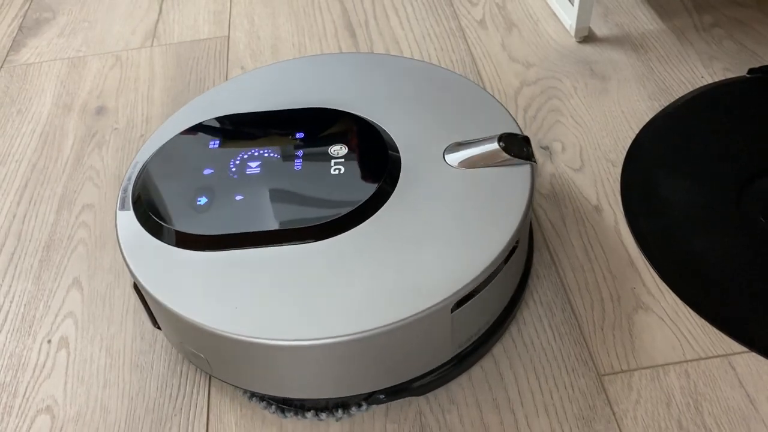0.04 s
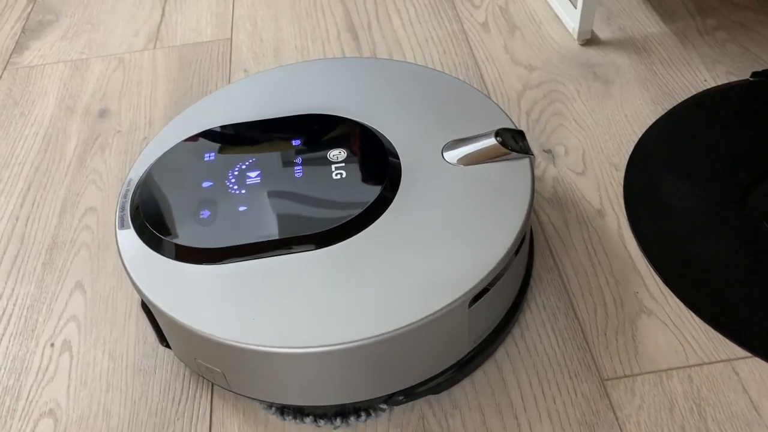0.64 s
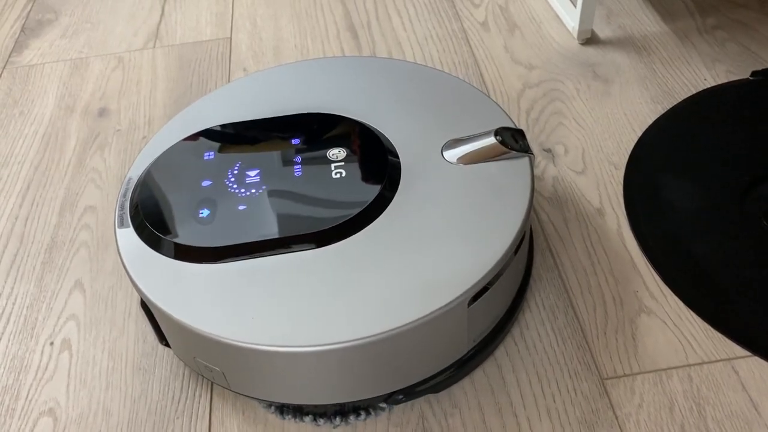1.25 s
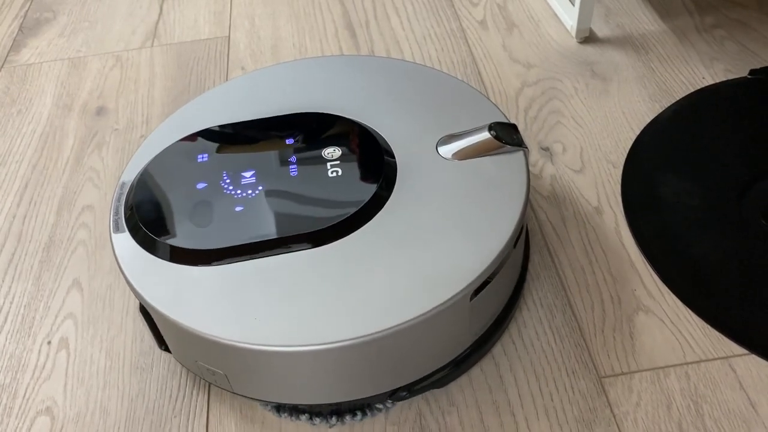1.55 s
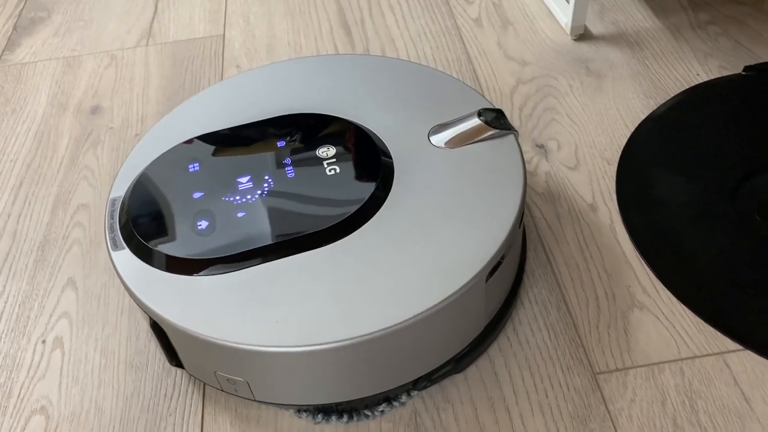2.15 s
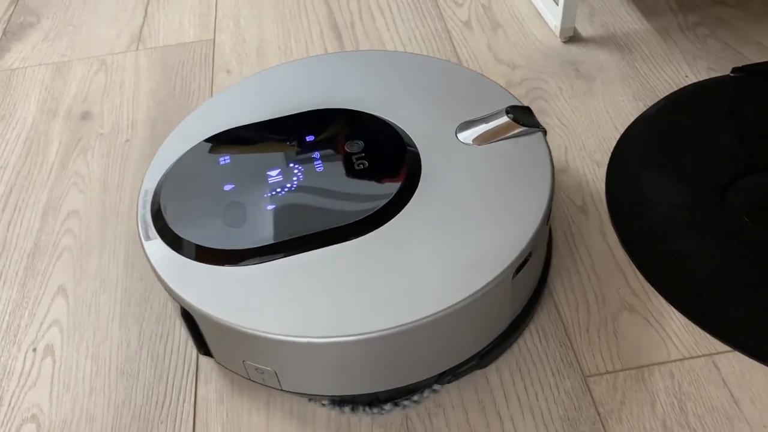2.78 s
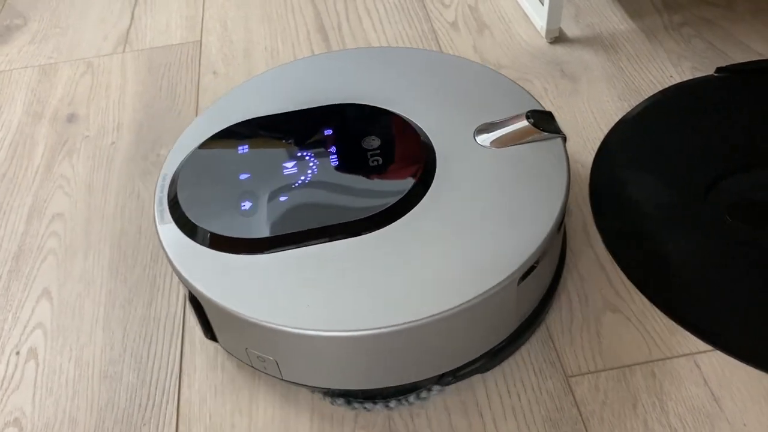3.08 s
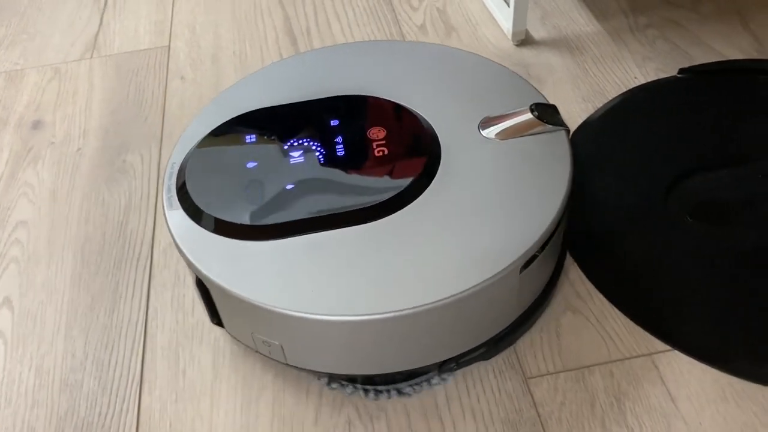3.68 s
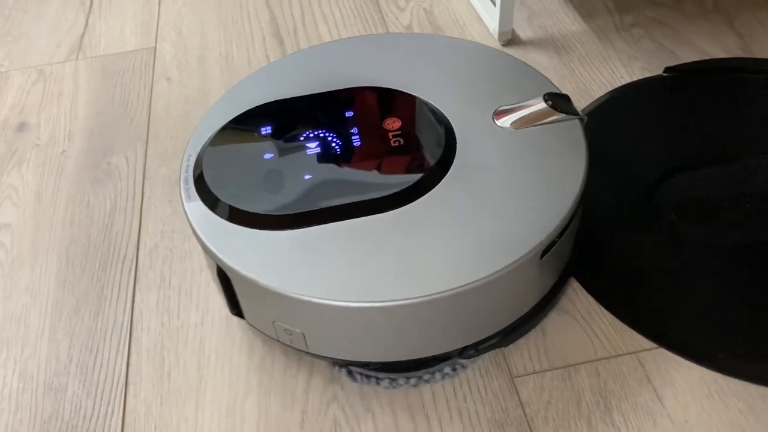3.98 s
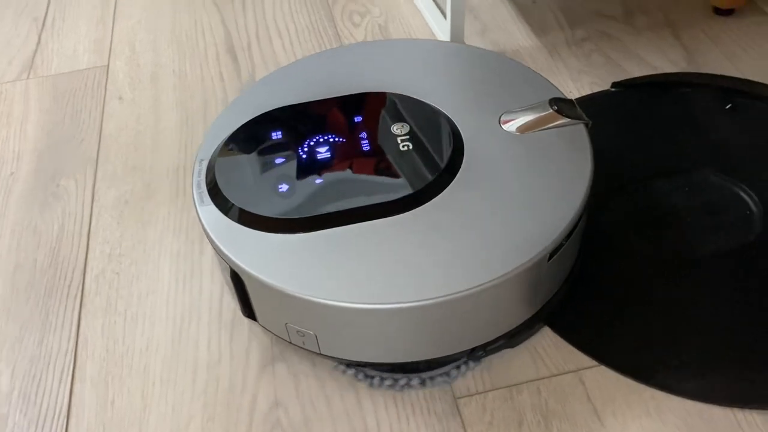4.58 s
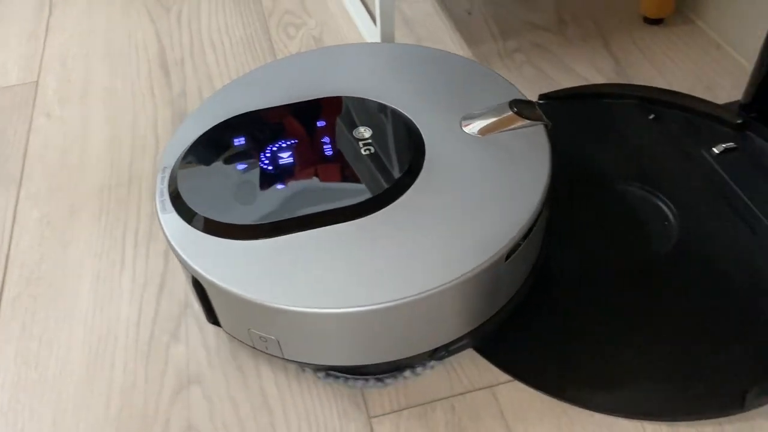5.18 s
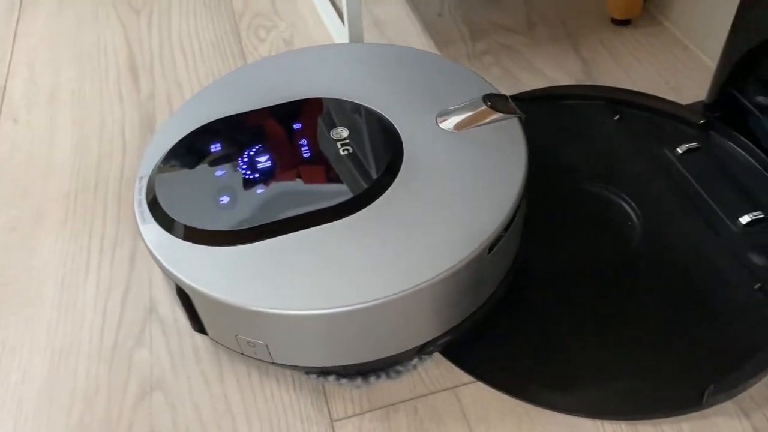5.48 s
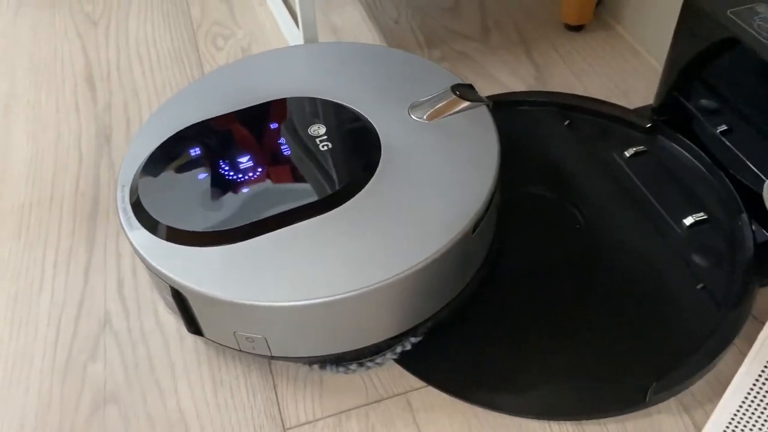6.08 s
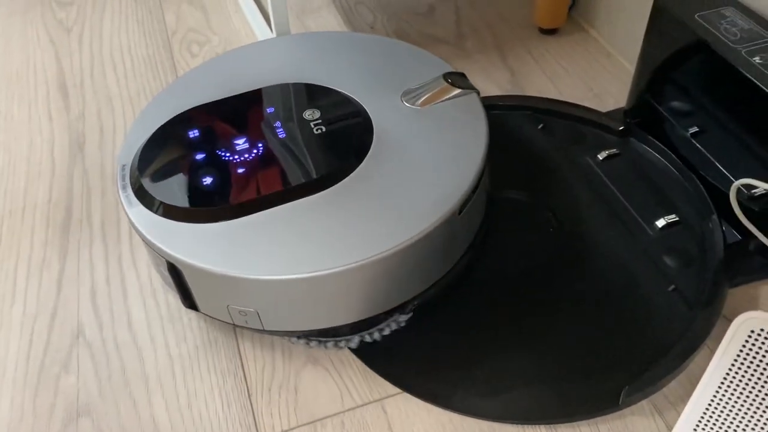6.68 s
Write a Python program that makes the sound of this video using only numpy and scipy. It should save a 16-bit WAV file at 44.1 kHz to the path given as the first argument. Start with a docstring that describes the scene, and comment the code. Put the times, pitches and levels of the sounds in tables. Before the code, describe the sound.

Quiet motor hum and cloth rubbing from a robot floor cleaner, with light knocks, a hollow bump and a closing low judder.

```python
"""A robot mop creeps over a laminate floor and up onto the plastic plate of its dock.
Taken in a quiet room, in stereo, on a phone an arm's length away. The drive rumbles, the gears whirr
and the motor electronics whine faintly. Two spinning cloth pads hiss on the floor and, sticking and
slipping, chatter into the shell, then into the hollow plate. The shell knocks and grit ticks on the
way; at last the pads rasp and judder against the ramp."""
import sys
import numpy as np
from scipy import signal
from scipy.fft import rfft, irfft, next_fast_len
from scipy.io import wavfile
from scipy.ndimage import uniform_filter1d, map_coordinates

SR = 44100
rng = np.random.default_rng(int(sys.argv[2]) if len(sys.argv) > 2 else 0)


def file_out(sig):
    """Save sig as 16-bit WAV at sys.argv[1]."""
    # one column per channel
    cols = np.atleast_2d(sig).T
    # limit, then scale
    lim = np.clip(cols, -1, 1)
    pcm = np.round(lim * 32767).astype(np.int16)
    wavfile.write(sys.argv[1], SR, pcm)


N = 306054
TIME = np.arange(N) / SR

# Levels in the tables are relative: each source adds its own gain and place.
# room tone at the microphone: f/Hz, level/dB
ROOM_SPECTRUM = [(20, 2.5), (40, -8.5), (85, 6.5), (140, -8.5), (230, -12), (400, -17.5), (900, -29.5),
                 (1900, -29.5), (3000, -36), (8000, -44.5), (16000, -49.5)]
# rumble of the drive: t/s, level/dB
RUMBLE_CURVE = [(0, -61.5), (0.06, -53.5), (0.22, -51.5), (0.37, -46), (0.47, -53), (0.58, -51),
                (0.74, -59.5), (1.0, -56), (2.04, -55.5), (2.1, -51.5), (2.22, -56), (3.5, -52.5),
                (4.7, -55), (5.5, -52), (5.8, -51), (6.19, -54.5), (6.235, -46), (6.36, -47), (6.43, -52.5),
                (6.58, -54.5), (6.7, -49)]
# brief dips of the rumble: t/s, length/s, depth/dB
RUMBLE_DIPS = [(1.945, 0.027, 6), (2.053, 0.03, 0), (3.12, 0.048, 11), (4.044, 0.044, 17),
               (4.564, 0.039, 2), (5.172, 0.055, 8.5), (5.406, 0.04, 9)]
# resonances of the body on its suspension: f/Hz, width/Hz, level/dB
BODY_PEAKS = [(61.44, 7, 2.5), (78.2, 12, 1.5), (99, 9.7, -11), (117, 8.9, -10), (170, 8.3, -34)]
# resonances of the gearboxes: f/Hz, width/Hz, level/dB
GEARBOX_PEAKS = [(570, 47, -2), (703, 90, -0.5), (1104, 250, -5), (1400, 300, -1), (1950, 99, -4),
                 (2310, 1300, -20.5)]
# whine of the motor electronics: t/s, level/dB
WHINE_CURVE = [(0.0, -93), (0.23, -88.5), (0.96, -86), (2.27, -94), (2.36, -90), (3.66, -92), (3.8, -85),
               (4.22, -83), (4.55, -91), (4.98, -88), (5.17, -85), (6.65, -82), (6.9, -90)]
# short wipes of the pads before they spin steadily: start/s, end/s, rub/dB, hiss/dB
PAD_WIPES = [(-.07, 0.305, -82, -101), (1.35, 1.668, -80.5, -100.5), (1.694, 1.883, -81.5, -100.5)]
# steady spin, louder and brighter as the cloth presses harder: t/s, rub/dB, hiss/dB
PAD_SPIN = [(2.3, -74, -86.5), (2.5, -73, -83), (2.9, -74, -83), (3.22, -73, -83.5), (3.35, -75.5, -87.5),
            (3.58, -76, -88), (3.72, -73, -81.5), (4.15, -73, -81.5), (4.58, -73, -85), (4.83, -71.5, -79),
            (4.92, -74, -83), (5.06, -72.5, -76.5), (5.3, -72.5, -80.5), (5.8, -71, -79.5),
            (6.4, -75, -83.5), (6.75, -75, -82.5)]
# damp cloth rubbing on laminate: f/Hz, level/dB
RUB_SPECTRUM = [(200, -0.5), (500, 0.5), (1000, -2), (2000, -0.5), (3000, -2), (4200, -6.5), (6000, -13),
                (9000, -24), (16000, -40)]
# fine, bright hiss, with dips near 9 and 13 kHz from the phone's audio coding: f/Hz, level/dB
HISS_SPECTRUM = [(1200, -20), (2200, -3), (3300, 4), (5000, 3), (7300, 5), (9000, -1), (11000, 3),
                 (13000, -3), (15500, -2.5)]
# resonances of the gap under the skirt: f/Hz, width/Hz, level/dB
SKIRT_PEAKS = [(700, 37, 2.5), (760, 20, -0.5), (1174, 30, -2), (1396, 59, -2.5), (1916, 37, -1.5),
               (1990, 52, -6), (2504, 120, -11.5), (2726, 130, -9.5), (3360, 160, -13), (4290, 160, -17)]
# the pads catch on the floor: middle/s, length/s, level/dB
CATCHES_ON_FLOOR = [(0.192, 0.29, -68.5), (0.586, 0.17, -75), (1.34, 0.18, -72), (2.193, 0.15, -69),
                    (2.795, 0.33, -66), (3.093, 0.2, -68.5), (4.207, 0.096, -65.5), (4.617, 0.042, -58.5),
                    (4.795, 0.15, -61), (5.091, 0.12, -59.5)]
# low and high resonances of the shell: f/Hz, width/Hz, level/dB
SHELL_DRUM_PEAKS = [(191.5, 42, 2.5), (260.5, 56, 1.5), (343, 39, -6.5), (401, 24, -5)]
SHELL_RATTLE_PEAKS = [(574, 20.3, 6), (696, 41, -1), (763, 64, -1), (849, 104, -1.5), (1160, 43, -4),
                      (1390, 280, -13.5)]
# soft scuffs at the skirt as the pads take hold: middle/s, length/s, level/dB
SKIRT_SCUFFS = [(0.227, 0.39, -76.5), (1.323, 0.15, -78), (1.585, 0.31, -76.5), (2.8, 0.42, -76)]
# grit under the wheels: t/s, peak/dB, centre/Hz
GRIT_TICKS = [(0.127, -72, 6000), (0.578, -67, 3000), (0.621, -68.5, 4000), (1.199, -75, 1700),
              (2.828, -57, 2600), (4.268, -55, 6460)]
# knocks in the shell: t/s, peak/dB, contact cut-off/Hz, low cut/Hz
SHELL_BLOWS = [(.581, -50.5, 1010, 620), (.623, -54, 905, 318), (.668, -59.5, 750, 477),
               (1.2, -62.5, 1700, 700), (1.279, -62, 695, 250), (1.918, -43, 700, 326),
               (2.081, -65, 1000, 590), (2.189, -51, 400, 377)]
# modes a blow rings in the shell: f/Hz, t60/s, level/dB
SHELL_RING = [(172, 0.12, 10.5), (363, 0.073, 2.5), (426, 0.041, -0.5), (581, 0.062, 1), (681, 0.081, 0),
              (1204, 0.045, -4.5), (1420, 0.032, -5), (1930, 0.029, 2), (2737, 0.051, -3),
              (3260, 0.078, -13)]
# the gearboxes labour as the pads first drag: middle/s, length/s, level/dB
GEAR_LOADS = [(1.62, 0.35, -82), (2.56, .18, -72), (2.82, 0.16, -69), (3.08, 0.14, -77)]
# resonances of the labouring gears: f/Hz, width/Hz, level/dB
LOADED_GEAR_PEAKS = [(710, 22, 4), (765, 17, 1), (1197, 29, -11.5)]
# skids of the skirt's rim, one rising, one falling: start/s, end/s, first f/Hz, last f/Hz, level/dB
RIM_SKIDS = [(2.076, 2.151, 650, 1300, -77), (2.127, 2.18, 420, 293, -67)]
# the cloth scrubs harder: middle/s, length/s, level/dB
CLOTH_BITES = [(2.808, 0.2, -75), (3.14, 0.34, -74.5), (3.92, 0.24, -74.5), (4.195, 0.27, -72.5),
               (5.7, 0.27, -80)]
# swish of the scrubbing: f/Hz, level/dB
SCRUB_SPECTRUM = [(1200, -23), (2300, -3), (2900, -1), (3700, -1), (4600, -4), (7000, -10), (14000, -52)]
# knocks on the dock: t/s, peak/dB, contact cut-off/Hz, low cut/Hz
DOCK_BLOWS = [(4.151, -48.5, 1000, 795), (4.155, -42.5, 258, 159), (4.156, -57, 2010, 1700),
              (4.606, -52, 1200, 197), (4.737, -50, 800, 400), (5.1, -50.5, 593, 110),
              (5.613, -32, 1870, 91), (6.507, -49, 650, 400), (6.644, -52, 650, 400)]
# modes a blow rings in the dock plate: f/Hz, t60/s, level/dB
PLATE_RING = [(149, 0.22, 3), (223, 0.034, -0.5), (295, 0.082, -7.5), (424, 0.027, -3.5), (590, 0.033, 1),
              (665, 0.032, 1.5), (838, 0.031, -4.5), (1070, 0.035, -3.5), (1170, 0.053, -9),
              (1450, 0.015, -3), (1930, 0.023, -9), (2254, 0.064, -6), (2680, 0.016, -6.5),
              (4250, 0.023, -6)]
# the pads catch on the plate: middle/s, length/s, level/dB
CATCHES_ON_PLATE = [(5.67, 0.083, -58.5), (6.03, 0.3, -58), (6.27, 0.091, -61.5), (6.64, 0.049, -59),
                    (6.773, 0.23, -56.5), (6.939, 0.09, -52.5)]
# low and high resonances of the hollow plate: f/Hz, width/Hz, level/dB
PLATE_DRUM_PEAKS = [(212, 60, 2.5), (274, 29, 1.5), (350, 50, -9)]
PLATE_RATTLE_PEAKS = [(588, 37, 4), (633, 34, -0.5), (837, 37, 2.5), (1010, 76, -5.5), (1422, 28, -8)]
# the pads rasp over the ramp's ribs: middle/s, length/s, level/dB
RIB_RASPS = [(6.64, 0.16, -73), (6.729, 0.03, -70), (6.806, .02, -65.5), (6.858, 0.09, -65.5)]
# resonances of the ramp's ribbed face: f/Hz, width/Hz, level/dB
RAMP_PEAKS = [(1090, 180, 0.5), (1390, 75, -1), (1960, 58, 0), (2190, 160, -2.5), (2320, 250, -7.5)]
# the pads judder on the ramp: t/s, slip rate/Hz, level/dB
JUDDER_CURVE = [(6.62, 62.2, -83), (6.72, 65.2, -57.5), (6.79, 58.2, -54.5), (6.85, 59.2, -39),
                (6.89, 58.8, -42.5), (6.94, 56.5, -37)]


def undb(db):
    """Decibels to gain."""
    return 10 ** (np.asarray(db) / 20)


def unit(x):
    """Scale to an rms of one."""
    return x / np.sqrt(np.mean(x ** 2))


def curves(table):
    """Each column after the times, at every sample."""
    times, *columns = np.transpose(table)
    return [np.interp(TIME, times, column) for column in columns]


def wander(rate_hz):
    """Smooth random drift with an rms of one."""
    hold = max(int(SR / rate_hz), 1)
    steps = np.repeat(rng.standard_normal(N // hold + 1), hold)
    return unit(uniform_filter1d(uniform_filter1d(steps, hold), hold)[:N])


def swell(middle_s, length_s):
    """A smooth rise and fall, above half height for the given length."""
    return .5 ** np.minimum((2 * (TIME - middle_s) / length_s) ** 2, 60)


def swells(table):
    """The summed gain of a table of swells."""
    return sum(undb(db) * swell(middle, length) for middle, length, db in table)


def through(x, response):
    """Filter by a function of frequency; the result has an rms of one."""
    size = next_fast_len(N, True)
    f = np.maximum(np.arange(size // 2 + 1) * SR / size, 1)
    return unit(irfft(rfft(x, size) * response(f), size)[..., :N])


def colour(x, spectrum):
    """Shape a sound by points of frequency and level."""
    hz, db = np.transpose(spectrum)
    return through(x, lambda f: undb(np.interp(np.log(f), np.log(hz), db)))


def resonate(x, peaks):
    """Pass a sound through parallel, steep-sided resonances."""
    return through(x, lambda f: sum(undb(db) / (1 + .5j * (f * f - hz * hz) / (f * width)) ** 2
                                    for hz, width, db in peaks))


def band(x, low_hz, high_hz):
    """Second-order high-pass and low-pass."""
    for hz, kind in ((low_hz, "high"), (high_hz, "low")):
        x = signal.sosfilt(signal.butter(2, min(hz, SR / 2 - 1000), kind, fs=SR, output="sos"), x)
    return x


def slips(per_s, spread_db):
    """Friction: two unrelated streams of tiny slips, a few much stronger than the rest."""
    slipping = rng.random((2, N)) < per_s / SR
    size = np.minimum(rng.exponential(size=(2, N)), 5)
    sign = rng.choice([-1, 1], (2, N))
    return slipping * sign * undb(spread_db * size)


def add(out, start_s, x):
    """Mix in a short sound."""
    i = int(start_s * SR)
    out[i:i + len(x)] += x[:N - i]


def pan(pair, pan_db):
    """Favour the left microphone over the right by pan_db."""
    return pair * undb(np.array([[pan_db], [-pan_db]]) / 2)


def place(pair, side_db, pan_db):
    """One stream reaches both microphones alike; the other is diffuse and differs between them."""
    mid, side = pair[0], undb(side_db) * pair[1]
    return pan(np.array([mid + side, mid - side]), pan_db)


def room(x, wet_db, t60=0.17):
    """The direct sound and a short tail from the walls, different at each microphone."""
    t = np.arange(SR // 2) / SR
    tail = rng.standard_normal((2, len(t))) * undb(-60 * t / t60) * (t > .003)
    tail *= undb(wet_db) / np.sqrt(np.sum(tail ** 2, axis=1, keepdims=True))
    return x + signal.fftconvolve(x[None], tail, axes=1)[:, :N]


def room_tone():
    """The quiet, dull air of the room, all round the phone."""
    air = colour(rng.standard_normal((2, N)), ROOM_SPECTRUM)
    return place(air * undb(-66.5), side_db=-3.5, pan_db=2.0)


def drive_rumble():
    """Dead centre, gears and wheels shake the body on its suspension; the level dips now and then."""
    db, = curves(RUMBLE_CURVE)
    dip_db = sum(depth * swell(middle, length) for middle, length, depth in RUMBLE_DIPS)
    shake = resonate(rng.standard_normal((2, N)), BODY_PEAKS)
    shake /= np.sqrt(uniform_filter1d(shake ** 2, size=3000))  # keeps the strength fairly even
    return place(shake * undb(db - dip_db + 1.4 * wander(26) + 1.5), side_db=-28.5, pan_db=0.0)


def gear_whirr(rub_gain, shaft_hz=57.6, idle_db=-87.0, load_db=7.5, max_load_db=-81.5):
    """Gear teeth whirr softly, pulsing once a shaft turn, louder against the pads' drag."""
    turn = 2 * np.pi * np.cumsum(shaft_hz * (1 + 0.016 * wander(6.1))) / SR
    teeth = resonate(slips(per_s=5000, spread_db=1.0), GEARBOX_PEAKS)
    load = np.minimum(rub_gain * undb(load_db), undb(max_load_db))
    whirr = teeth * (1 + 0.17 * np.sin(turn)) * np.hypot(undb(idle_db), load)
    return place(whirr, side_db=3, pan_db=0.0)


def motor_whine(whine_hz=15391, neighbour_gap_hz=118):
    """The motor electronics sing one thin, fluttering tone with a weak neighbour below it."""
    db, = curves(WHINE_CURVE)
    phase = 2 * np.pi * np.cumsum(whine_hz + 13 * wander(90)) / SR
    neighbour = undb(-15 + 2.0 * wander(19)) * np.sin(phase - 2 * np.pi * neighbour_gap_hz * TIME)
    flutter_db = 1.5 * wander(45)
    return unit(np.sin(phase) + neighbour) * undb(db + flutter_db + 3.5)


def stroke(start, end, attack_s, release_s=0.064):
    """The pads come up to speed, hold, and run down after the end."""
    rise = np.clip((TIME - start) / attack_s, 0, 1) ** 2
    return rise * np.exp(-np.maximum(TIME - end, 0) / release_s)


def pad_contact(spin_start_s=2.225):
    """Gains of the rub and of the fine hiss: a few wipes, then the steady spin."""
    strokes = [(stroke(start, end, attack_s=0.093), rub_db, hiss_db)
               for start, end, rub_db, hiss_db in PAD_WIPES]
    strokes.append((stroke(spin_start_s, N / SR, attack_s=0.058), *curves(PAD_SPIN)))
    rub_gain = sum(shape * undb(rub_db) for shape, rub_db, _ in strokes)
    hiss_gain = sum(shape * undb(hiss_db) for shape, _, hiss_db in strokes)
    return rub_gain, hiss_gain


def skirt_ring(friction, pitch_drift=0.014, flex_hz=5):
    """Slips ring the gap under the skirt; the skirt flexes, so the pitch wanders slightly."""
    ring = resonate(friction, SKIRT_PEAKS)
    position = np.arange(N) + np.cumsum(pitch_drift * wander(flex_hz))
    return np.array([map_coordinates(x, [position], order=3, mode="mirror") for x in ring])


def underside(pair, echo_db=-9, t60=.03, turns_per_s=1.299):
    """Sound bounces between floor and chassis; the ripple in its spectrum shifts as the pads turn."""
    t = np.arange(SR // 30) / SR
    bounces = rng.standard_normal((2, len(t))) * undb(-60 * t / t60) * (t > .001)
    bounces = signal.sosfilt(signal.butter(2, 2000, "high", fs=SR, output="sos"), bounces)
    bounces *= undb(echo_db) / np.sqrt(np.sum(bounces ** 2, axis=1, keepdims=True))
    front, back = (signal.oaconvolve(pair, path[None], axes=1)[:, :N] for path in bounces)
    angle = 2 * np.pi * turns_per_s * TIME
    return unit(pair + front * np.cos(angle) + back * np.sin(angle))


def pad_hiss(rub_gain, hiss_gain, touch_s=4.3):
    """Damp cloth rubs the floor left of centre and rings the skirt gap, under a wide, bright hiss."""
    grip_db = .5 * wander(35)  # the cloth presses unevenly as it turns
    # the gap rings less once the mop touches the dock and tips up
    skirt_db = np.interp(TIME, [touch_s - .5, touch_s + .5], [-2.5, -9])
    rub = colour(slips(per_s=9000, spread_db=2.5), RUB_SPECTRUM)
    rub += undb(skirt_db) * skirt_ring(slips(per_s=6000, spread_db=3.5))
    hiss = colour(slips(per_s=15000, spread_db=4.0), HISS_SPECTRUM)
    rub = underside(rub) * rub_gain * undb(grip_db + 5.0)
    hiss = underside(hiss) * hiss_gain * undb(grip_db + 6.5)
    return place(rub, side_db=-5, pan_db=4.0) + place(hiss, side_db=-0.5, pan_db=0.2)


def pad_chatter(rub_gain, catches, drum_peaks, rattle_peaks, drum_db, rattle_db, catch_rattle_db):
    """The pads stick and slip, harder at each catch: heavy slips drum the panels, light ones rattle."""
    caught = swells(catches)
    drum = resonate(slips(per_s=700, spread_db=2.5), drum_peaks)
    drum *= np.hypot(rub_gain * undb(drum_db), caught)
    rattle = resonate(slips(per_s=1000, spread_db=1.5), rattle_peaks)
    rattle *= np.hypot(rub_gain * undb(rattle_db), caught * undb(catch_rattle_db))
    return place(drum, side_db=-6.0, pan_db=0.2) + place(rattle, side_db=-5.5, pan_db=0.5)


def skirt_scuffs():
    """The edge of the cloth drags and rings the gap under the skirt, without any hiss."""
    scuff = band(skirt_ring(slips(per_s=2000, spread_db=4.0)), 400, 2600)
    return place(scuff * swells(SKIRT_SCUFFS), side_db=-7.5, pan_db=4.0)


def grit_ticks(t60=0.069):
    """Grit snaps under the wheels and the walls answer briefly."""
    out, t = np.zeros(N), np.arange(SR // 8) / SR
    for start, db, hz in GRIT_TICKS:
        noise = resonate(rng.standard_normal(N), [(hz, .75 * hz, 0)])[:len(t)]
        snap = band(noise, 300, 1.7 * hz) * undb(-60 * t / t60)
        add(out, start, snap * undb(db) / np.abs(snap).max())
    return room(out, wet_db=-7)


def knocks(blows, modes, rebound_s, scuff_db, wet_db, pan_db, scuff_t60=0.15):
    """Each blow lands, rebounds and scuffs, ringing the plastic; softer contacts are duller."""
    out, t = np.zeros(N), np.arange(SR // 4) / SR
    for start, db, contact_hz, low_cut_hz in blows:
        ring = np.zeros(len(t))
        for k, (hz, t60, mode_db) in enumerate(modes):
            detuned_hz = hz * (1 + 0.014 * rng.standard_normal())
            ring += (-1) ** k * undb(mode_db - 60 * t / t60) * np.sin(2 * np.pi * detuned_hz * t)
        force = rng.standard_normal(len(t)) * undb(scuff_db - 60 * t / scuff_t60)
        force[0] += 1  # the landing
        force[int(rebound_s * SR)] += .6
        blow = band(signal.fftconvolve(force, ring)[:len(t)], low_cut_hz, contact_hz)
        add(out, start, blow * undb(db) / np.abs(blow).max())
    return pan(room(out, wet_db), pan_db)


def gear_labour():
    """Off to the right, the gears hum in their narrowest resonances under extra drag."""
    hum = resonate(rng.standard_normal((2, N)), LOADED_GEAR_PEAKS)
    return place(hum * swells(GEAR_LOADS), side_db=-6, pan_db=-6.0)


def rim_skids(relative_width=0.24):
    """The rim of the skirt skids as the mop shifts its weight; its scrape glides in pitch."""
    out = np.zeros((2, N))
    for start, end, first_hz, last_hz, db in RIM_SKIDS:
        progress = np.clip((TIME - start) / (end - start), 0, 1)
        hz = first_hz * (last_hz / first_hz) ** progress
        grain = unit(band(rng.standard_normal((2, N)), 2.5, relative_width * first_hz))
        scrape = unit(grain * np.sin(2 * np.pi * np.cumsum(hz) / SR))
        out += scrape * undb(db) * swell((start + end) / 2, 0.89 * (end - start))
    return place(out, side_db=-8, pan_db=5.0)


def cloth_scrubs():
    """Where the cloth bites into the floor, a grainy swish swells over the even hiss."""
    swish = colour(slips(per_s=5000, spread_db=2.0), SCRUB_SPECTRUM)
    return place(swish * swells(CLOTH_BITES), side_db=-4, pan_db=2.0)


def ramp_rasps():
    """Well to the left, the cloth grates over the ribs of the ramp in short, bright bursts."""
    rasp = resonate(slips(per_s=2500, spread_db=5.5), RAMP_PEAKS)
    return place(rasp * swells(RIB_RASPS), side_db=-3.0, pan_db=8.5)


def ramp_judder():
    """Against the ramp the slips lock into a regular low drone, alike at both microphones."""
    hz, db = curves(JUDDER_CURVE)
    phase = 2 * np.pi * np.cumsum(hz * (1 + 0.0014 * wander(36))) / SR
    drone = np.sin(phase) + undb(-7.0) * np.sin(2 * phase) + undb(-20) * np.sin(3 * phase)
    return unit(drone) * undb(db + 7.0)


def scene(mount_s=5.62):
    """The mop from an arm's length; its chatter passes from floor to plate as it mounts the dock."""
    mounted = uniform_filter1d(1. * (TIME > mount_s), size=800)
    rub_gain, hiss_gain = pad_contact()
    on_floor = pad_chatter(rub_gain, CATCHES_ON_FLOOR, SHELL_DRUM_PEAKS, SHELL_RATTLE_PEAKS,
                           drum_db=1.5, rattle_db=1.5, catch_rattle_db=-4.5)
    on_plate = pad_chatter(rub_gain, CATCHES_ON_PLATE, PLATE_DRUM_PEAKS, PLATE_RATTLE_PEAKS,
                           drum_db=12.5, rattle_db=5.0, catch_rattle_db=-5.5)
    chatter = on_floor * (1 - mounted) + on_plate * mounted
    shell = knocks(SHELL_BLOWS, SHELL_RING, rebound_s=.0028, scuff_db=-29, wet_db=-9, pan_db=3.5)
    dock = knocks(DOCK_BLOWS, PLATE_RING, rebound_s=.0033, scuff_db=-35, wet_db=-11, pan_db=.5)
    machinery = drive_rumble() + gear_whirr(rub_gain) + gear_labour() + motor_whine()
    mopping = pad_hiss(rub_gain, hiss_gain) + cloth_scrubs() + skirt_scuffs() + rim_skids()
    ramp = ramp_judder() + ramp_rasps()
    return machinery + mopping + chatter + ramp + shell + dock + grit_ticks() + room_tone()


def record(dry, top_hz=15750):
    """The phone cuts the top steeply, just above the whine."""
    return signal.sosfilt(signal.ellip(10, .2, 70, top_hz, fs=SR, output="sos"), dry)


dry = scene()
out = record(dry)
file_out(out)
```